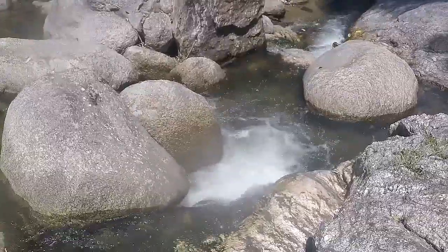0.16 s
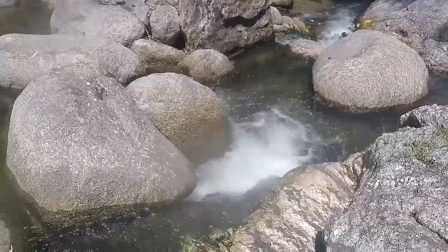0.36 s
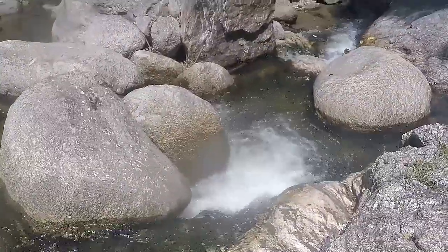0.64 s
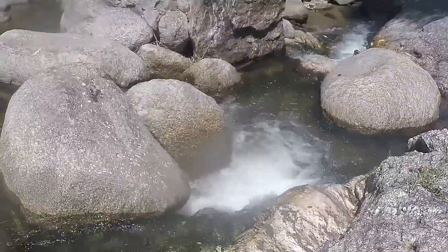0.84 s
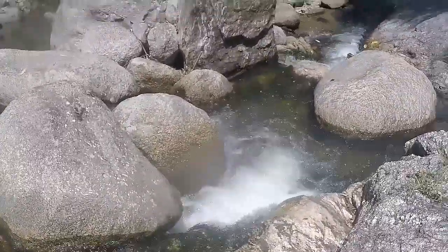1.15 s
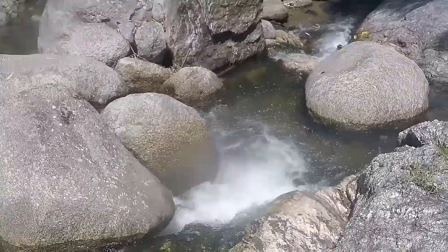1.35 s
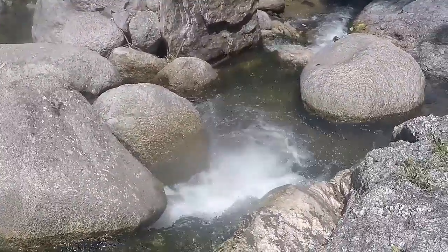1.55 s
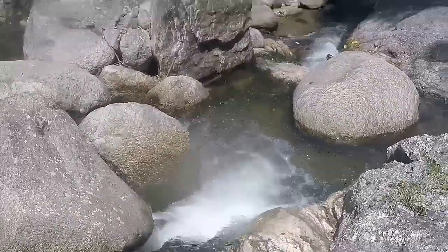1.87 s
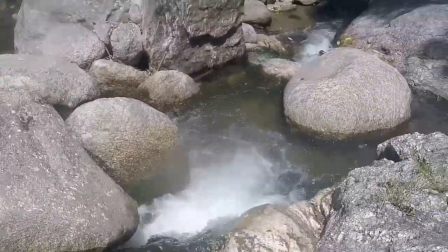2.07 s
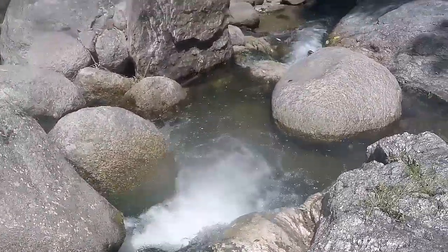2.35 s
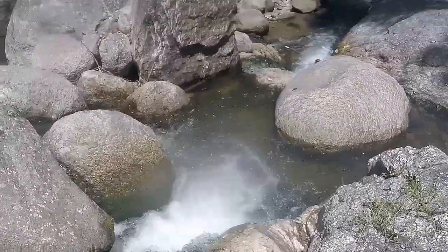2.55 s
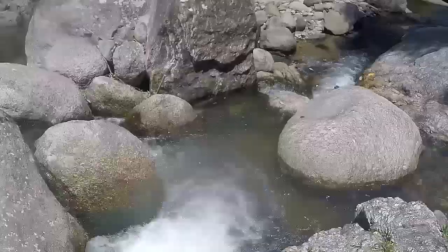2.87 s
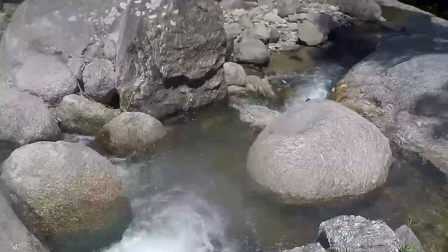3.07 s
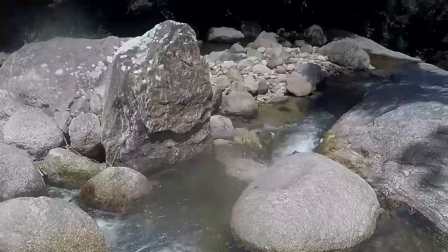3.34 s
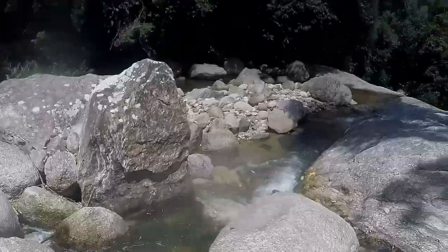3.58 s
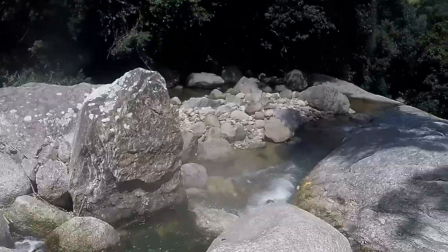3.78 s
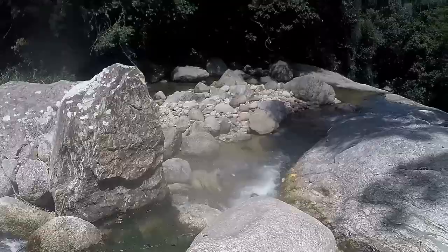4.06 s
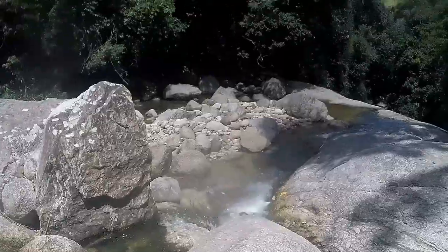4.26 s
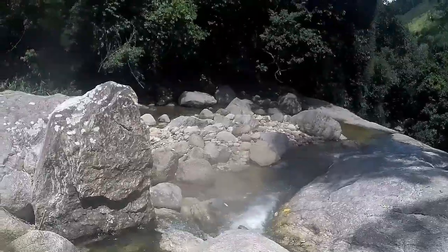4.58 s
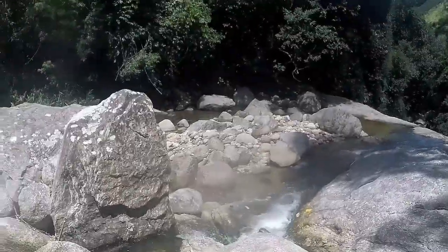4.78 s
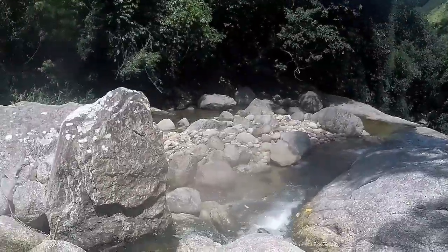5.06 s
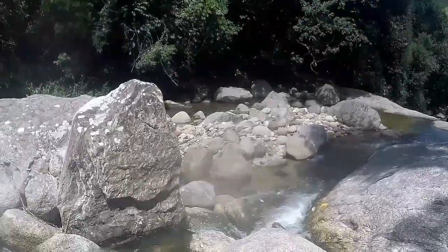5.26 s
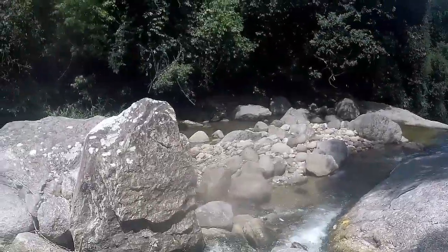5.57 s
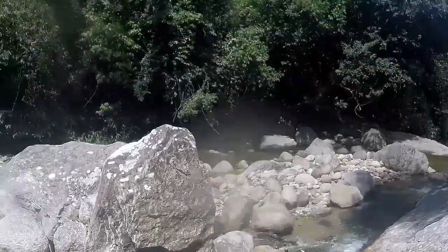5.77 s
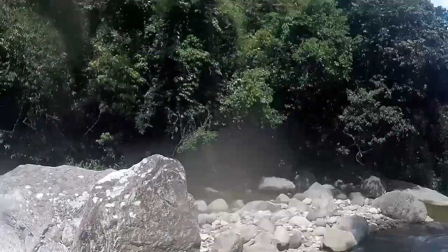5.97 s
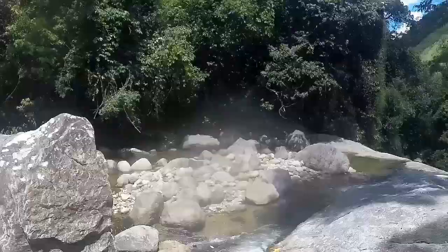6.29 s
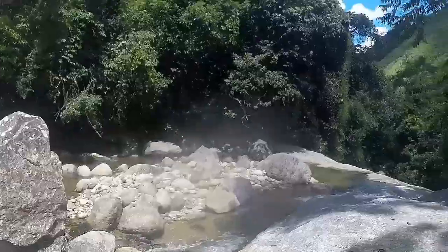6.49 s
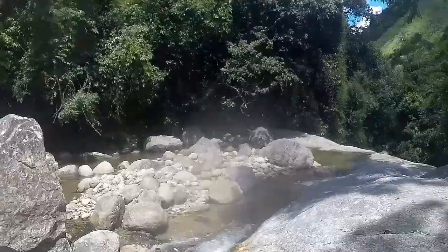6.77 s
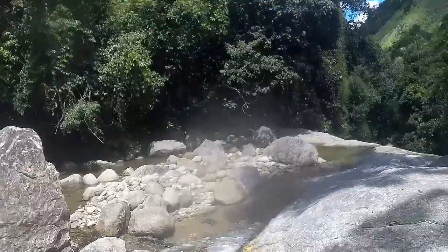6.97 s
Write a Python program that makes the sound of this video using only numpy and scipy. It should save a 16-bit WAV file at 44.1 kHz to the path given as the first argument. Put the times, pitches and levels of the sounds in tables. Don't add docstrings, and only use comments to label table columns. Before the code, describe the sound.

Throughout about seven seconds, a mountain stream rushes between boulders into a pool: a dense, steady wash of bubbles and hissing spray, slightly hollow through a hard camera housing. Soft low knocks of the hand come at 0.2 and 0.6 s. From about 1.4 s, deep wind gusts buffet the microphone in short lumps with a fluttering edge, strong around 1.9, 2.1 and 2.9 s. Small bubbles plop faintly between 1.4 and 2.8 s, and light spray slaps brighten the hiss from 2.6 to 3.3 s. A cluster of dull bumps falls at 3.3-3.6 s as the camera tilts up and the water's tone shifts. Tiny drops tick at 4.5 s, with a strong gust at 4.6 s and a thud at 4.75 s. The firmest knocks and a small creak come at 5.9-6.1 s, then a heavy gust at 6.2 s. The tone turns more boxy, the rush eases slightly, and two soft bumps follow before it cuts off mid-flow.

```python
import sys
import numpy as np
from scipy import signal
from scipy.fft import rfft, irfft
from scipy.io import wavfile
from scipy.ndimage import uniform_filter1d

SR = 44100
rng = np.random.default_rng(int(sys.argv[2]) if len(sys.argv) > 2 else 0)


def boost_factor(decibels):
    exponent = np.asarray(decibels, float) / 20
    return 10 ** exponent


def digitize_waveform(pressure):
    field = np.atleast_2d(pressure).T
    bounded = np.clip(field, -1, 1)
    quanta = np.round(bounded * 32767).astype(np.int16)
    wavfile.write(sys.argv[1], SR, quanta)


N = 314433

# (time [s], rush level [dB], tilt [0 down at the pool, 1 level, 2 raised])
STREAM_PATH = [(0, -47, 0.04), (1.0, -46.5, 0.11), (2.0, -46, 0.28), (2.8, -46, 0.39), (3.4, -46.5, 1.1),
               (4.2, -46.5, 1), (5.0, -46.5, 1.2), (5.9, -46.5, 0.99), (6.2, -46.5, 1.54),
               (6.6, -47.5, 1.5), (7.13, -47.5, 1.37)]
# (frequency [Hz], density [dB per Hz])
WATER_SPECTRUM = [(71, -35), (120, 0), (399, -5.5), (1100, -3), (1350, -3), (1660, -2), (3980, -9),
                  (4690, -8), (6900, -16), (7800, -20), (9950, -20.5), (15600, -30.5)]
# (centre [Hz], width [Hz], gain pointing down [dB], gain level [dB], gain raised [dB])
HOUSING_CAVITIES = [(228, 37, 3, 3, -1.5), (423, 140, -1, -0.5, 8.5), (930, 160, 0.5, 2, 8.5),
                    (1126, 126, 0, 3.5, 4.5), (1334, 120, -5.5, -0.5, -4), (1470, 63, 4, 2, 0),
                    (1644, 156, 5, 1.5, 7), (1917, 137, 5.5, 2.5, 0), (2460, 240, 3.5, 2.5, -3),
                    (2900, 204, -3, -3, -7.5), (3153, 220, 4.5, 2, 1.5), (3520, 510, 1, -1, -0.5),
                    (4090, 170, -1.5, -4, 3), (4700, 640, 4.5, 2.5, -2), (4900, 130, -2.5, 4, 8),
                    (4970, 140, -8, -6, 0), (5480, 330, 7, 4, 7.5), (5940, 210, 4.5, 0, 0),
                    (6220, 320, 0.5, 2.5, 1), (6500, 180, 6.5, -8, -6), (6870, 760, 1, 6.5, 7.5),
                    (9300, 250, 1.5, -0.5, -6), (11250, 500, 2, 2, -1), (11740, 1300, -3.5, -4.5, 0)]
# (time [s], lift of the fine hiss [dB], negative lowers it)
SPRAY_SLAPS = [
    (.858, 2),
    (1.083, -1),
    (2.295, 2),
    (2.629, 6.5),
    (2.754, 4.0),
    (2.918, 6),
    (3.128, 4),
    (3.342, 7.5),
    (4.31, 5),
    (5.762, 1),
]
# (time [s], pitch [Hz], peak level [dB])
BUBBLE_PLOPS = [
    (1.409, 1880, -43),
    (1.545, 2550, -48),
    (1.635, 1140, -43),
    (1.748, 2020, -47),
    (2.21, 1470, -42),
    (2.514, 2410, -46),
    (2.808, 980, -45),
    (3.533, 1170, -44),
    (6.758, 1800, -46),
    (6.932, 1040, -42),
]
# (time of the crest [s], level [dB], half length [s])
GUST_SWELLS = [(0.355, -40, .03), (0.62, -39.5, 0.05), (0.885, -36.5, 0.036), (1.03, -35.5, .06),
               (1.37, -29, 0.05), (1.57, -29.5, .025), (1.865, -25.5, 0.02), (2.02, -34, .035),
               (2.125, -26.5, .03), (2.61, -38.5, 0.076), (2.88, -27.5, 0.08), (3.06, -28.5, 0.043),
               (3.33, -38.5, 0.25), (3.575, -31, 0.021), (3.87, -28, 0.063), (3.96, -35, 0.026),
               (4.33, -37, 0.021), (4.6, -25.5, 0.044), (4.755, -35.5, 0.057), (4.94, -41, 0.031),
               (5.18, -39, 0.16), (5.6, -31, 0.062), (5.74, -31.5, .07), (6.05, -30, 0.087),
               (6.17, -24, 0.052), (6.35, -26.5, 0.02), (6.49, -35.5, 0.019), (6.76, -35, 0.056),
               (6.93, -36.5, 0.059), (7.12, -35, 0.024)]
# (frequency [Hz], density [dB per Hz])
BUFFET_SPECTRUM = [(2.5, -28), (5.5, -16), (10, -13.5), (18, 3.5), (28, -8), (38, -7.5), (50, -7.5),
                   (65, -35), (90, -35), (160, -73), (300, -120)]
# (time of the crest [s], level [dB], half length [s])
FLUTTER_SWELLS = [(.08, -54, 0.033), (.2, -49, 0.044), (.6, -44, 0.027), (.8, -52.5, 0.17),
                  (1.4, -44, .045), (1.73, -48, 0.047), (1.93, -42.5, .03), (2.25, -49, 0.094),
                  (2.6, -53, 0.2), (2.92, -43.5, .06), (3.09, -52, 0.058), (3.38, -44.5, 0.18),
                  (3.54, -52, .04), (3.75, -46, .04), (3.93, -48, .06), (4.23, -49.5, 0.032),
                  (4.55, -50, .08), (4.76, -51, .045), (5.18, -47.5, .04), (5.35, -57, 0.28),
                  (5.72, -52, 0.033), (5.82, -48, 0.029), (5.95, -45, 0.074), (6.16, -46.5, 0.076),
                  (6.48, -47, 0.038), (6.7, -50, .1), (6.86, -41, .035), (7.0, -43, 0.04)]
# (frequency [Hz], density [dB per Hz])
FLUTTER_SPECTRUM = [(35, -23), (60, 9), (90, 0), (140, -10), (220, -18.5), (400, -35), (900, -80),
                    (2000, -120)]
# (time [s], peak level [dB], first pitch [Hz], t60 [s], direction of the push [sign])
HAND_KNOCKS = [(0.193, -29, 100, .18, -1), (0.586, -25.5, 187, 0.31, -1), (2.136, -38, 120, 0.1, 1),
               (2.168, -36, 110, 0.27, -1), (3.3103, -31.5, 150, 0.088, 1), (3.331, -40, 150, 0.083, 1),
               (3.342, -30, 139, 0.19, 1), (3.356, -35, 150, 0.088, 1), (3.366, -43, 140, 0.079, 1),
               (3.416, -38, 120, 0.19, 1), (3.532, -38, 150, 0.052, 1), (3.541, -33, 110, 0.056, 1),
               (3.552, -39, 140, 0.095, 1), (4.756, -31, 130, 0.29, -1), (5.916, -30, 128, 0.22, 1),
               (5.9893, -32.5, 650, 0.012, 1), (5.9909, -26.5, 170, 0.12, 1), (6.0113, -34, 420, 0.017, 1),
               (6.0125, -27, 110, 0.077, -1), (6.1012, -19, 560, 0.013, -1), (6.105, -30.5, 556, 0.021, -1),
               (6.1029, -20.5, 132, 0.124, -1), (6.479, -34.5, 80, 0.22, 1), (6.851, -34, 119, 0.2, 1)]
# (time [s], peak level [dB], share of the side modes [dB])
SHELL_TICKS = [
    (4.5078, -39, -14),
    (4.5092, -41, -12),
    (4.5141, -42, -8),
    (6.0156, -40, 1.5),
    (6.0167, -40, 1.5),
]
# (frequency [Hz], t60 [s])
PORT_CAVITY = (4800, 0.013)
# (frequency [Hz], level [dB], t60 [s])
SHELL_MODES = [(1150, 3, .005), (2050, -2, .005), (2900, 3.5, 0.0066), (3860, -5, 0.0047), (5850, -3, .005),
               (7000, -11, 0.0047), (10000, -14, 0.0017)]


def stream():
    rush_db, tilt = in_time(STREAM_PATH)
    water = froth(per_s=40000, spread_db=1.93, cycles=5.6, surge_db=1.1, hiss_db=-1.5)
    water = water + boost_factor(-21) * gurgles(per_s=120, low_hz=699.4, high_hz=3054, cycles=52.0, rise=0.262)

    poses_db = np.tile(slope(WATER_SPECTRUM), (3, 1))
    for hz, width_hz, *pose_db in HOUSING_CAVITIES:
        bump = np.exp(-0.5 * ((bins() - hz) / (0.47 * width_hz)) ** 2)
        poses_db = poses_db + np.outer(pose_db, bump)

    distance = np.abs(np.clip(tilt, 0, 2) - np.arange(3)[:, None])
    shares = np.clip(1 - distance, 0, 1)
    rush = sum(share * rms_one(coloured(water, db)) for share, db in zip(shares, poses_db))
    return boost_factor(rush_db + 0.5) * rush


def froth(per_s, spread_db, cycles, surge_db, hiss_db):
    sizes = boost_factor(spread_db * np.minimum(rng.exponential(1, N), 5)) * rng.choice([-1, 1], N)
    bursts = sizes * (rng.random(N) < per_s / SR)
    pitches = np.geomspace(200, 15000, 26)
    spray_db = spray_surges(surge_db)
    dealt = rng.integers(0, len(pitches), N)
    bubbles = 0
    for k, hz in enumerate(pitches):
        fine = np.clip(0.61 * np.log(hz / 2000), 0, 1)
        swell = boost_factor(fine * spray_db + 0.52 * drift(13))
        voices = rms_one(ring(bursts * (dealt == k), hz, cycles / hz))
        bubbles = bubbles + np.sqrt(hz) * swell * voices
    far = boost_factor(hiss_db) * rng.standard_normal(N)
    mix = rms_one(bubbles) + far
    smooth = uniform_filter1d(np.abs(rfft(mix)) ** 2, size=2001)
    return rms_one(coloured(mix, -10 * np.log10(smooth + 1e-12)))


def spray_surges(surge_db):
    t, slap_s = np.arange(N) / SR, 0.006
    slaps_db = sum(lift_db * np.exp(-0.5 * ((t - s) / slap_s) ** 2) for s, lift_db in SPRAY_SLAPS)
    surges = drift(41) + 0.57 * drift(60)
    surges = surges - uniform_filter1d(surges, size=6000)
    return surge_db * surges + 0.85 * slaps_db


def gurgles(per_s, low_hz, high_hz, cycles, rise):
    born = np.flatnonzero(rng.random(N) < per_s * boost_factor(5.0 * drift(5)) / SR)
    out, t = np.zeros(N + 2048), np.arange(2048) / SR
    for at, (size, strength) in zip(born, rng.random((len(born), 2))):
        hz = low_hz * (high_hz / low_hz) ** size
        age = t * hz / cycles
        shape = (1 - np.exp(-30 * age)) * boost_factor(-60 * age - 5.7 * strength)
        out[at:at + len(t)] += shape * np.sin(2 * np.pi * hz * t * (1 + rise * age))
    return rms_one(out[:N])


def plops(swell_s, rise):
    out, t = np.zeros(N), np.arange(2048) / SR
    age = t / swell_s
    shape = age * np.exp(1 - age)
    for s, hz, peak_db in BUBBLE_PLOPS:
        tone = np.sin(2 * np.pi * hz * t * (1 + rise * age))
        out[round(s * SR):][:len(t)] += boost_factor(peak_db) * shape * tone
    return out


def wind():
    breeze_db, flutter_lull_db = -42, -56.5
    lumps = rms_one(coloured(rng.standard_normal(N), slope(BUFFET_SPECTRUM)))
    even = np.sqrt(uniform_filter1d(lumps ** 2, size=4400) + 0.25)
    buffet = swells(GUST_SWELLS, breeze_db) * rms_one(lumps / even)

    jolts = rng.standard_normal(N) * boost_factor(4.6 * drift(26))
    flutter = rms_one(coloured(jolts, slope(FLUTTER_SPECTRUM)))
    return buffet + swells(FLUTTER_SWELLS, flutter_lull_db) * flutter


def swells(rows, lull_db):
    t = np.arange(0, N + 64, 64) / SR
    crests = sum(boost_factor(2 * db) * np.exp(-((t - s) / half_s) ** 2) for s, db, half_s in rows)
    return np.interp(np.arange(N) / SR, t, np.sqrt(boost_factor(2 * lull_db) + crests))


def knocks():
    slack_hz, slacken_s = 42, 0.004
    extra_cycles = 3.6
    out, t = np.zeros(N), np.arange(int(0.25 * SR)) / SR
    for s, peak_db, first_hz, t60, direction in HAND_KNOCKS:
        last_hz = slack_hz + extra_cycles / t60
        pitch = last_hz + (first_hz - last_hz) * np.exp(-t / slacken_s)
        contact = 1 - np.exp(-(6.9 * first_hz * t) ** 2)
        shake = np.sin(2 * np.pi * np.cumsum(pitch) / SR) * boost_factor(peak_db - 60 * t / t60)
        out[round(s * SR):][:len(t)] += np.sign(direction) * contact * shake
    return out


def ticks():
    s, peak_db, side_db = np.transpose(SHELL_TICKS)
    at = np.round(s * SR).astype(int)
    clicks = np.zeros(N)
    clicks[at] = boost_factor(peak_db)
    out = ring(clicks, *PORT_CAVITY)
    signs = rng.choice([-1, 1], (len(at), len(SHELL_MODES)))
    for k, (hz, level_db, t60) in enumerate(SHELL_MODES):
        clicks = np.zeros(N)
        clicks[at] = signs[:, k] * boost_factor(peak_db + side_db + level_db)
        out += ring(clicks, hz, t60)
    return signal.sosfilt(signal.butter(4, 9500, fs=SR, output="sos"), out)


def ring(clicks, hz, t60):
    r = boost_factor(-60 / (t60 * SR))
    w = 2 * np.pi * hz / SR
    return signal.lfilter([0, np.sin(w)], [1, -2 * r * np.cos(w), r * r], clicks + 1e-18)


def drift(per_s):
    step = 40
    r = np.exp(-2 * np.pi * per_s * step / SR)
    noise = rng.standard_normal(N // step + 2002)
    slow = signal.lfilter([1], [1, -2 * r, r * r], noise)[2000:]
    return np.interp(np.arange(N) / step, np.arange(len(slow)), rms_one(slow))


def rms_one(x):
    return x / np.sqrt(np.mean(x ** 2) + 1e-20)


def in_time(rows):
    s, *columns = np.transpose(rows)
    return [np.interp(np.arange(N) / SR, s, c) for c in columns]


def bins():
    return np.maximum(np.arange(N // 2 + 1) * SR / N, 1)


def slope(points):
    hz, level_db = np.transpose(points)
    return np.interp(np.log(bins()), np.log(hz), level_db)


def coloured(x, gain_db):
    return irfft(rfft(x) * boost_factor(gain_db), N)


def scene():
    water = stream() + plops(swell_s=0.0031, rise=0.0085)
    handling = knocks() + ticks()
    return (water + wind() + handling)[None, :]


def top_cut(x):
    return signal.sosfilt(signal.butter(12, 15730, fs=SR, output="sos"), x)


def record(dry):
    top_hz, top_db, end_hz = 15270, -4.5, 15750
    cut = signal.sosfilt(signal.butter(2, 5, "high", fs=SR, output="sos"), dry)
    treble_db = top_db * (bins() > top_hz) - 60 * (bins() > end_hz)
    finished = coloured(cut, treble_db)
    return top_cut(finished)


dry = scene()
out = record(dry)
digitize_waveform(out)
```